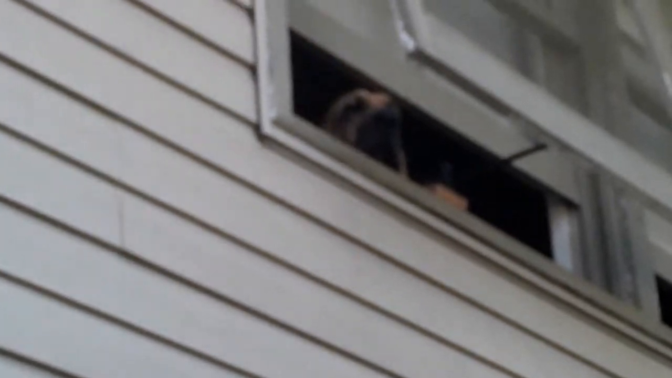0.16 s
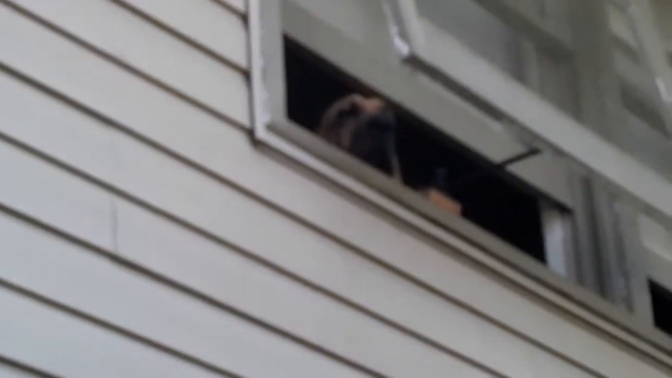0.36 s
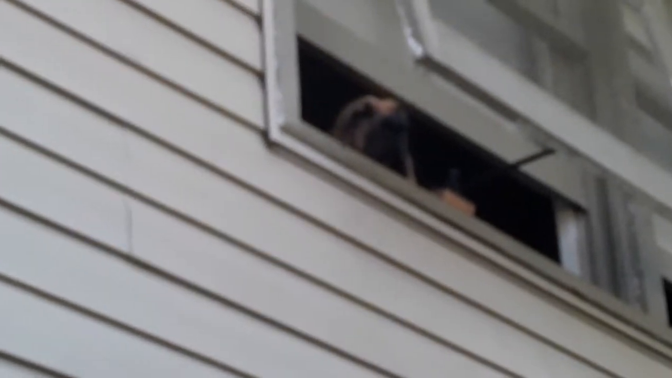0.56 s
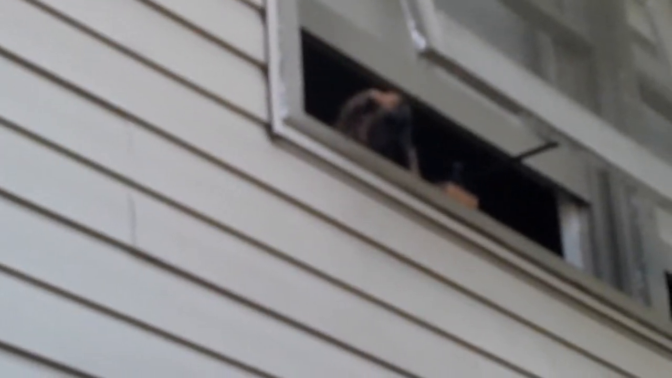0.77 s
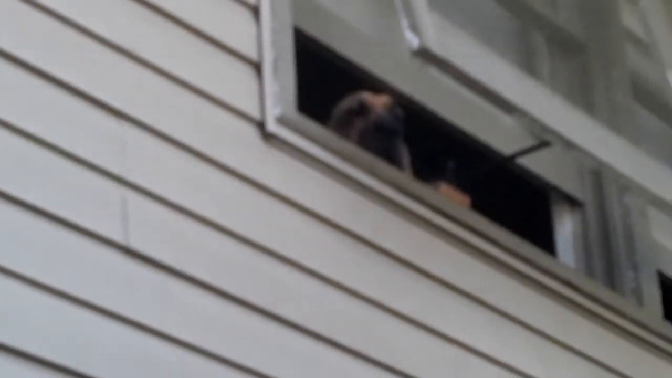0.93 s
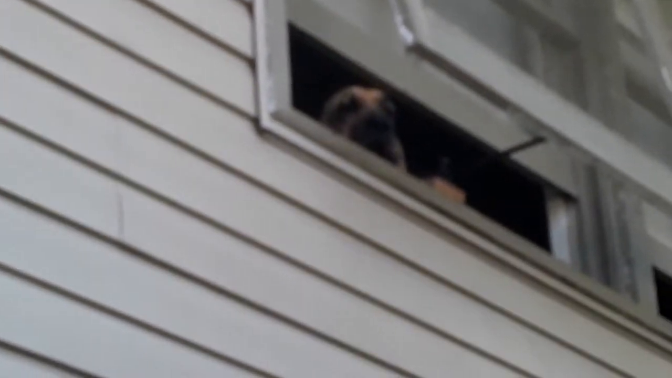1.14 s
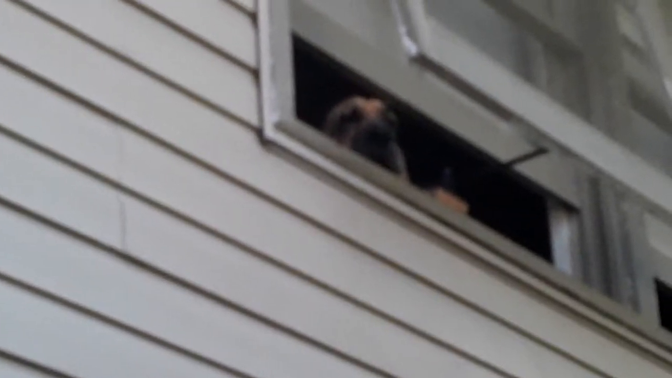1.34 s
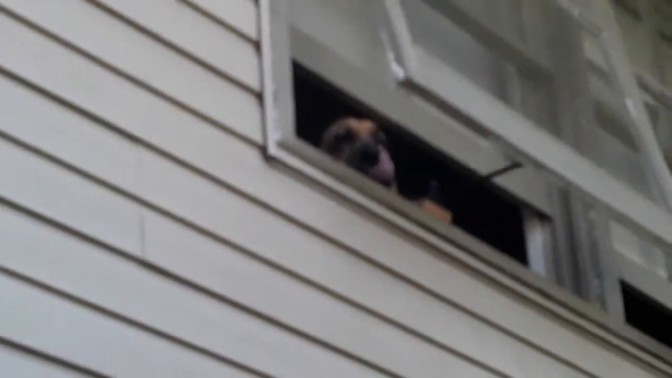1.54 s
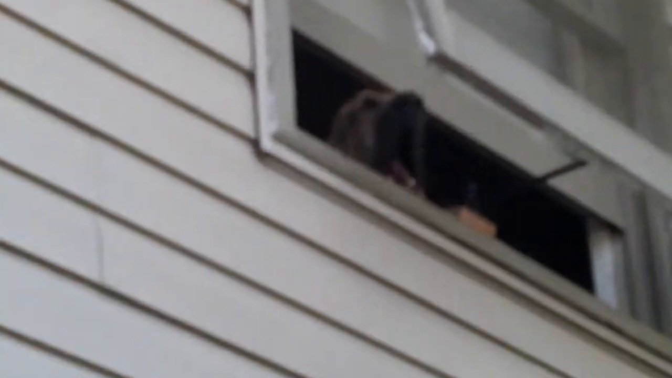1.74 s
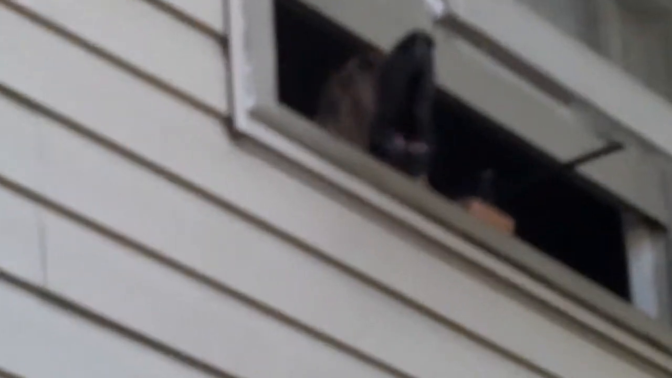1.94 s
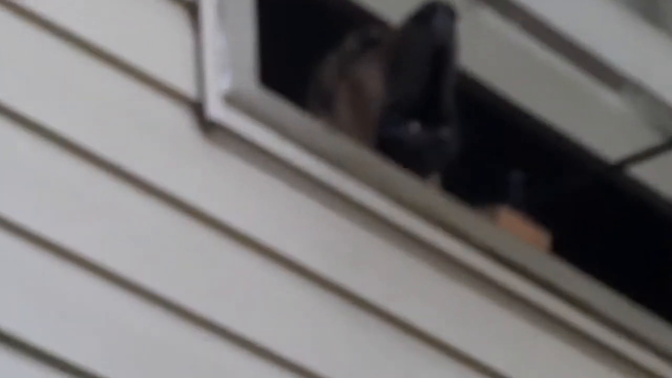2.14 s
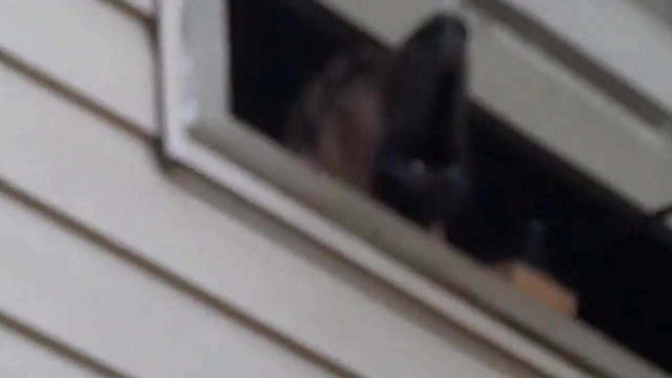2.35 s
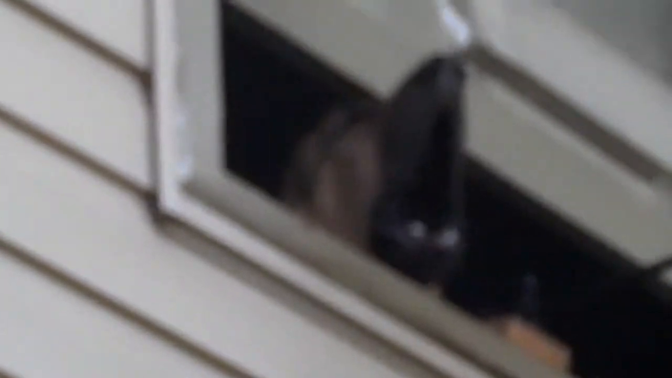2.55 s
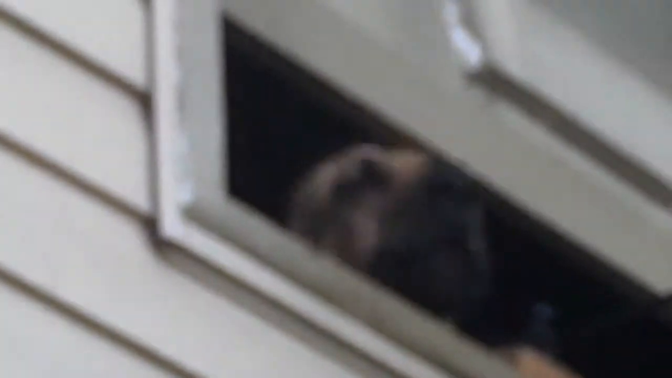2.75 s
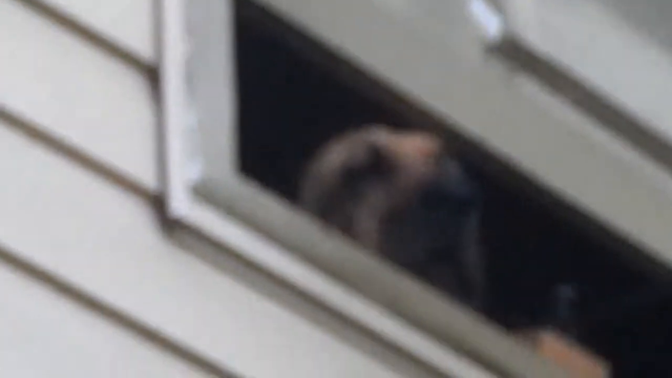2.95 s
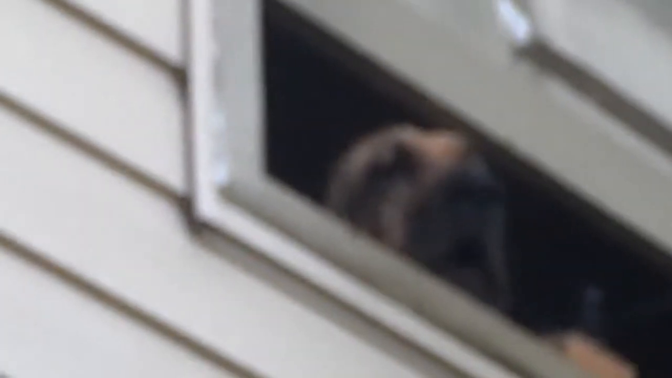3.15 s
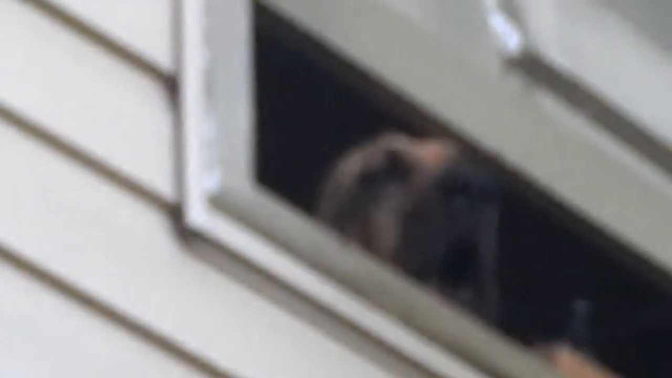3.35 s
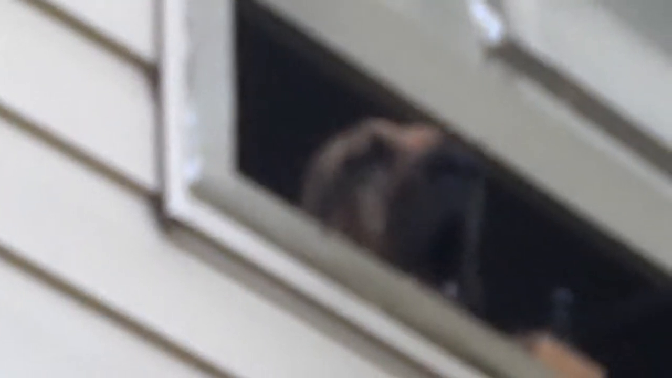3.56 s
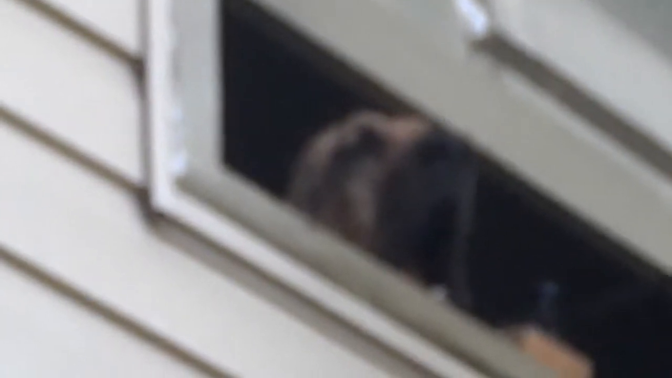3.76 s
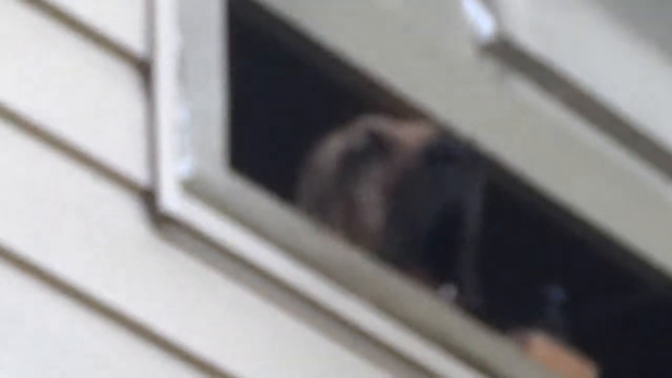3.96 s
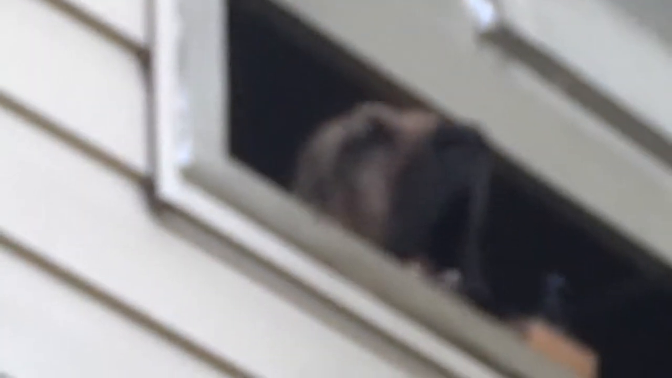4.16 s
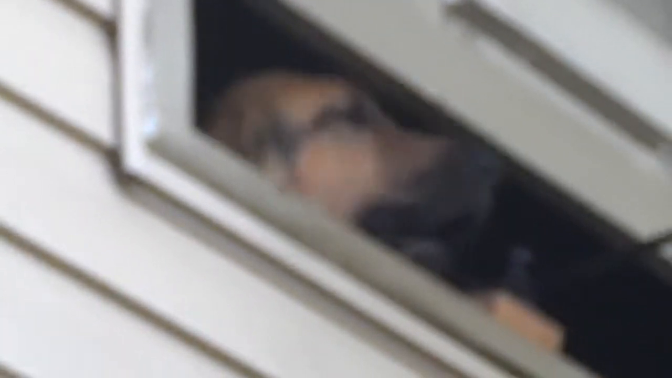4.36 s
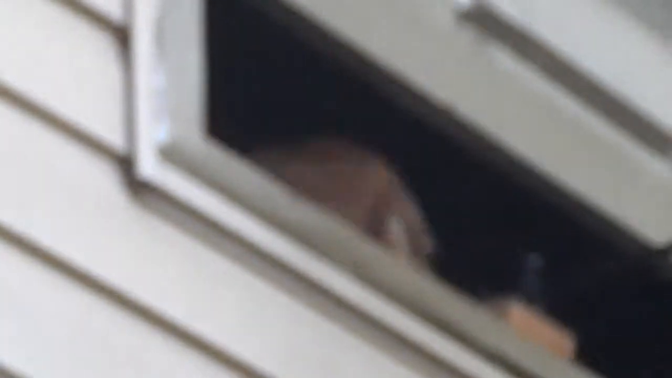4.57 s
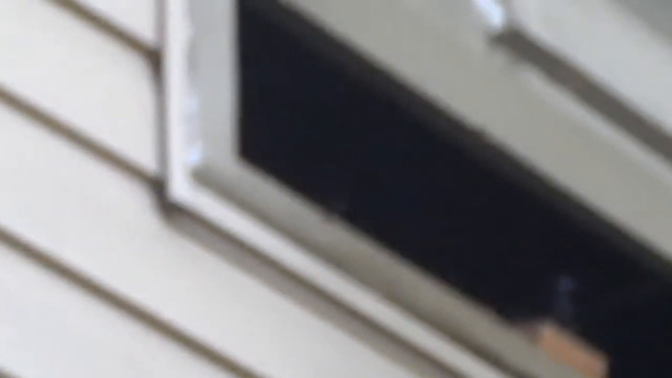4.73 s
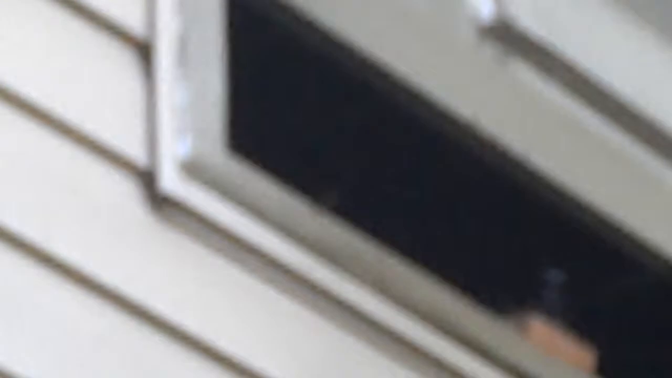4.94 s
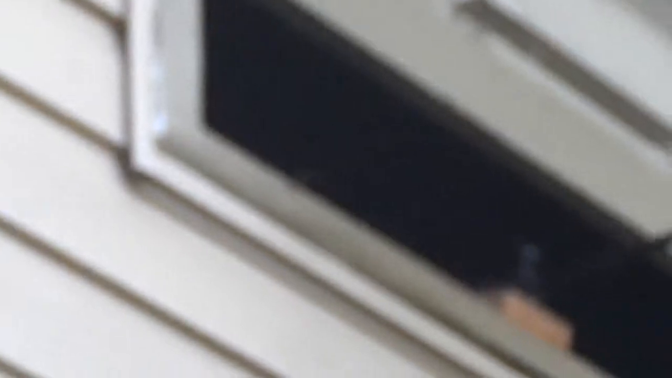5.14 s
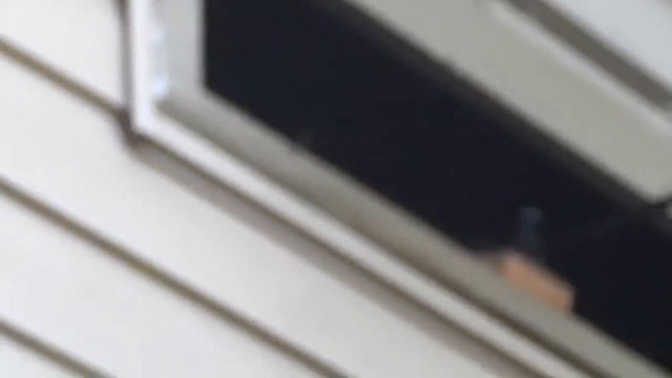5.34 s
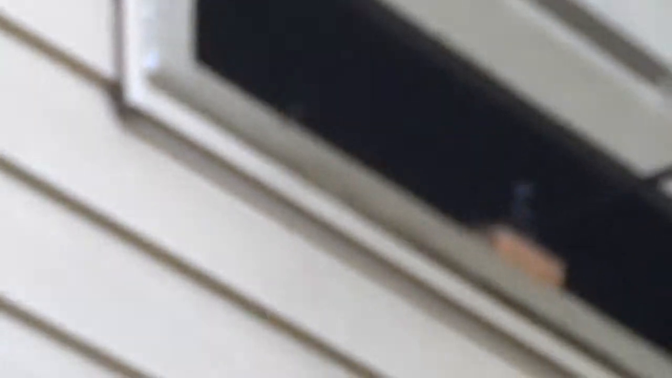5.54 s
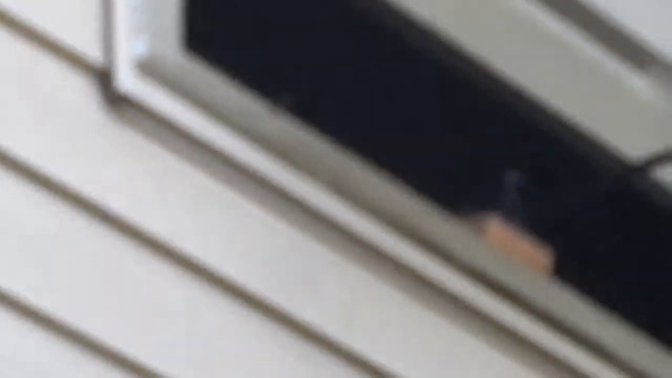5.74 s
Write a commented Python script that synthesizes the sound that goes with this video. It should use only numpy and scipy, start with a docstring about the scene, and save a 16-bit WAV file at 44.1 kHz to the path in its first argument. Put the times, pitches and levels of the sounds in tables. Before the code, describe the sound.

A large hound throws out a long loud howl, then a breaking, yodelling one, while a hoarser dog bays farther off and sparrows chirp.

```python
"""A bloodhound howls, then yodels, from an open upstairs window: its voice swoops, splits and breaks into rasp.
Its vocal folds are summed harmonics, shaped by throat, mouth and lips. A second, hoarse dog bays further off.
A thin whine and chirping sparrows are gliding tones; lip smacks and outdoor air are shaped noise.
Two wavering low tones hum, and the walls of the yard echo everything but the air and hum."""
import sys
import numpy as np
from scipy import signal
from scipy.fft import rfft, irfft, next_fast_len
from scipy.io import wavfile
from scipy.ndimage import uniform_filter1d, map_coordinates

SR = 44100
rng = np.random.default_rng(int(sys.argv[2]) if len(sys.argv) > 2 else 0)


def generate_wav(sig):
    """Save sig (samples, or channels by samples) to the path in sys.argv[1] as 16-bit PCM at SR."""
    pcm = np.round(np.clip(np.atleast_2d(sig).T, -1, 1) * 32767).astype(np.int16)
    wavfile.write(sys.argv[1], SR, pcm)


N = 255779  # length in samples
TOP_HZ = 15650  # no sound above this


def amp(db):
    """Decibels to gain."""
    return 10 ** (np.asarray(db) / 20)


def unit(x):
    """Scale to rms 1."""
    return x / np.sqrt(np.mean(x ** 2) + 1e-20)


def along(points, hz):
    """Read a curve of (Hz, value) points on a log frequency axis."""
    f, v = np.transpose(points)
    return np.interp(np.log(hz + 1), np.log(f + 1), v)


def curves(rows):
    """One value per sample for each column after the time."""
    s, *cols = np.transpose(rows)
    return [np.interp(np.arange(N) / SR, s, c) for c in cols]


def wobble(rate):
    """A smooth random curve, with this many random points a second."""
    return map_coordinates(rng.standard_normal(N // 16), [np.arange(N) * rate / SR], mode="wrap")


def filtered(x, response):
    """Multiply the spectrum of x by a function of frequency."""
    size = next_fast_len(N + 8192)
    spectrum = rfft(x, size) * response(np.fft.rfftfreq(size, 1 / SR))
    return irfft(spectrum, size)[..., :N]


def coloured(x, points):
    """Shape x with a curve of (Hz, dB) points."""
    return filtered(x, lambda hz: amp(along(points, hz)))


def steady(x):
    """Hold the short-term rms at 1."""
    return x / np.sqrt(np.abs(uniform_filter1d(x ** 2, size=900)) + 1e-12)


def sounding(phrases):
    """1 while a phrase lasts, with soft edges; phrases that touch are joined."""
    t = np.arange(N) / SR
    on = sum((t > p[0][0] - .006) & (t < p[-1][0] + .006) for p in phrases) > 0
    return uniform_filter1d(on * 1., size=300)


def step(at, edge):
    """A smooth rise from 0 to 1 around a moment."""
    return .5 + .5 * np.tanh((np.arange(N) / SR - at) / edge)


def held(start, end, attack, release):
    """Rise smoothly to 1, hold, and fall smoothly to 0."""
    return step(start, attack) * (1 - step(end, release))


def spread(pair, width):
    """Two unrelated signals become a shared part and a part opposed in the two channels."""
    shared, opposed = pair[0], width * pair[1]
    return np.array([shared + opposed, shared - opposed]) / np.hypot(1, width)


# How fast the yard's echo dies. Each row: frequency in Hz, time to fall by 60 dB in seconds.
YARD_DECAY = [(200, 0.12), (600, 0.47), (1500, 0.42), (4000, 0.41), (10000, 0.29)]


def echo(x, width=0.63):
    """The yard's answer: a tail of noise in which each frequency dies at its own speed."""
    hz, t, z = signal.stft(rng.standard_normal((2, SR)), SR, nperseg=256)
    decay = amp(-60 * t / along(YARD_DECAY, hz)[:, None])
    tail = signal.istft(z * decay, SR, nperseg=256)[1]
    tail = spread(tail / np.linalg.norm(tail[0]), width)
    tail = np.pad(tail, ((0, 0), (500, 0)))  # the walls answer after 500 samples
    return signal.fftconvolve(x[None], tail, axes=1)[:, :N]


def folds(pitch, split, rasp, lock, swing, jitter, hiss, tremor):
    """Vocal folds; when split, a second oscillation, locked to a fraction of the pitch, pushes the pulses about."""
    phase = 2 * np.pi * np.cumsum(pitch * (1 + tremor * wobble(70))) / SR
    second = split * np.sin(phase * lock + rasp * wobble(90))
    phase = phase + swing * second + jitter * rasp * wobble(420)
    pulses = sum(np.sin(k * phase) / k * (k * pitch < TOP_HZ) for k in range(1, 25))
    size = 1 + .5 * second + .35 * rasp * wobble(260)
    # air rushes through once a cycle
    air = unit(coloured(rng.standard_normal(N), [(500, -1.0), (2000, -10), (10000, -15.5)]))
    return pulses * size + hiss * (rasp + 0.06) * air * (1 + np.cos(phase))


# Tone colour of the outdoor air. Each row: frequency in Hz, relative level in dB.
AIR_COLOUR = [(25, -19), (70, -16), (115, -0.5), (200, -6), (330, -4.5), (550, -7.5), (1000, -13.5),
              (2000, -17.5), (3800, -19.5), (6000, -25), (9000, -29.5), (15000, -37.5)]
# The recorder turns the background down around the loud howls, then back up.
# Each row: time in seconds, level of the air in dB.
AIR_LEVEL = [(0, -59.5), (1.8, -55), (2.1, -63), (3.2, -63), (4, -58.5), (4.8, -61), (5.2, -59)]
# Tones of the hum. Each row: frequency in Hz, relative level in dB.
HUM_TONES = [(118.4, -69), (172.3, -72)]


def background():
    """Outdoor air as shaped noise, and the unsteady hum of a distant machine as wavering sines."""
    air_db, = curves(AIR_LEVEL)
    air = unit(coloured(spread(rng.standard_normal((2, N)), width=0.05), AIR_COLOUR))
    air = air * amp(0.35 * wobble(1.9))
    t = np.arange(N) / SR
    hum = np.zeros(N)
    for hz, db in HUM_TONES:
        level = amp(db + 4.0 + 1.1 * wobble(0.57))
        hum += level * np.sin(2 * np.pi * hz * t + 2.0 * wobble(3.7))
    # the recorder's changing gain lowers and raises the hum together with the air
    return amp(air_db) * air + amp(air_db - air_db.mean()) * hum


BAY_TAPER_DB = 5.5  # a call is this much weaker at its ends
BAY_SKEW = 0.13  # the pitch sags less at the start than at the end
THROAT_DB_PER_OCTAVE, MOUTH_DB_PER_OCTAVE = 20, 71  # fading as the arch of pitch sinks
SLACK_SPLIT_PER_OCTAVE, SLACK_RASP_PER_OCTAVE = 2.2, 1.3  # roughening as it sinks


def bay(start, length, hz, glide, arch, throat_db, mouth_db, split, rasp):
    """One call as rows of (s, pitch, throat dB, mouth dB, split, rasp): loudest and clearest atop its arch."""
    u = np.linspace(-1, 1, 15)  # from the start of the call to its end
    sag = arch * u ** 2 * (1 + BAY_SKEW * u)  # octaves below the top of the arch
    taper_db = BAY_TAPER_DB * u ** 2
    return np.transpose([start + length * (u + 1) / 2,
                         hz * 2 ** (glide * u / 2 - sag),
                         throat_db - taper_db - THROAT_DB_PER_OCTAVE * sag,
                         mouth_db - taper_db - MOUTH_DB_PER_OCTAVE * sag,
                         split + SLACK_SPLIT_PER_OCTAVE * sag,
                         rasp + SLACK_RASP_PER_OCTAVE * sag])


# The far dog's bays and whimpers, each an arch of pitch on a glide. Each row: start in seconds, length
# in seconds, pitch in Hz, glide in octaves, arch in octaves, relative throat level in dB,
# relative mouth level in dB, split of the folds (0-1), rasp (0-1).
BAYS = [(0, .135, 490, -.3, .01, -46, -62, 1, 0.8), (0.656, .28, 379.6, .01, .34, -34.5, -31, 0.1, 0.43),
        (1.305, .295, 362.7, -.06, .28, -32, -29.5, 0.08, 0.2),
        (2.931, 0.25, 456.3, .03, .01, -62.5, -56.5, 0.3, .35),
        (4.924, .12, 388, -.35, .01, -40, -52.5, 0.08, 0.1),
        (5.038, .24, 396.9, 0.16, 0.033, -38.5, -56.5, .1, 0),
        (5.297, .3, 375.1, -.1, .28, -34, -36.5, .5, 0.4),
        (5.758, 0.032, 339.6, -0.29, 0.0034, -39, -65, 0, 0)]
# Resonances of its throat and mouth. Each row: frequency in Hz, relative level in dB.
FAR_THROAT = [(150, -46.5), (280, -1.5), (380, -6.5), (550, -3.5), (720, -26.5), (900, -27), (1200, -85.5)]
FAR_MOUTH = [(550, -50), (760, -6), (900, -2), (1080, 3.5), (1280, -12), (1440, -3), (1530, -3),
             (1700, -19.5), (1900, -12.5), (2300, -11), (3200, -55)]
# Rings when a bay opens into a bark. Each row: frequency in Hz, relative level in dB.
FAR_GAPE = [(330, -33), (470, 13.5), (570, 0), (720, -6.5), (900, -35.5)]
# Sizzle of teeth and lips, for both dogs. Each row: frequency in Hz, relative level in dB.
SIZZLE_COLOUR = [(2100, -60), (2650, -30.5), (3300, 3.5), (4600, 4.5), (6000, 4), (7400, 2.5), (8700, -6),
                 (11000, -9.5), (15000, -16)]
BAY_LOCK = 2 / 3  # when the folds split, the second oscillation runs at this fraction of the pitch
BAY_WAVER_DB, BAY_WAVER_RATE = 2, 28  # random waver in strength; its random points a second


def far_dog():
    """Hoarse bays: rough folds ring in a throat and a mouth, and arrive with much more echo."""
    calls = [bay(*row) for row in BAYS]
    pitch, throat_db, mouth_db, *roughness = curves(np.vstack(calls))
    split, rasp = np.clip(roughness, 0, 1)
    source = folds(pitch, split, rasp, lock=BAY_LOCK, swing=0.4, jitter=0.46, hiss=0.75, tremor=.014)
    throat = coloured(source, FAR_THROAT) + 5.6 * split * coloured(source, FAR_GAPE)
    voice = amp(throat_db - 5.5) * steady(throat)
    voice += amp(mouth_db - 5.5) * steady(coloured(source, FAR_MOUTH))
    breathy = source + 0.18 * rng.standard_normal(N)
    voice += amp(mouth_db - 29) * steady(coloured(breathy, SIZZLE_COLOUR))
    # a hoarse throat sputters
    sputter_db = 2 * rasp * wobble(50) + BAY_WAVER_DB * wobble(BAY_WAVER_RATE)
    voice *= sounding(calls) * amp(sputter_db)
    return voice + amp(-6.0) * echo(voice, width=0.69)


# One sparrow chirp, before each bird's own pitch and level.
# Each row: time from its start in seconds, pitch in Hz, relative level in dB.
CHIRP = [(0, 3472, -8), (.011, 4900, -1.5), (.024, 4552, -10), (.031, 3903, 5), (.043, 3271, 5),
         (.066, 2764, -40), (.08, 2900, 0), (.091, 3314, 2.5), (0.113, 2987, -25.5)]
# The chirps. Each row: start in seconds, relative level in dB, pitch ratio, echo relative to the chirp in dB.
SPARROWS = [(0.593, -66, 1.3, 6), (0.85, -57, 1.11, 1.5), (1.361, -52, 1.15, 8.5), (1.726, -40, 1.02, -6),
            (2.846, -54.5, 0.99, -5), (3.129, -72.5, 1.28, 7), (3.519, -63, 1.13, 4.5),
            (3.761, -56.5, 1.09, -0.5), (3.916, -61.5, 1.12, -1), (4.549, -72, 1.3, 9),
            (4.639, -72, 1.08, -4), (4.873, -54.5, 1.3, 0), (4.889, -54.5, 1.05, -0.5), (5.532, -46, 1, -8)]


def sparrows():
    """Each chirp sweeps up, drops and flicks again, sung by both sides of the syrinx; far birds are mostly echo."""
    direct, scattered = np.zeros((2, N))
    flutter = 1 + 0.09 * wobble(500)
    for start, db, ratio, echo_db in SPARROWS:
        shape = np.array(CHIRP) + [start, 0, 0]
        pitch, contour_db = curves(shape)
        phase = 2 * np.pi * np.cumsum(pitch * ratio * flutter) / SR
        both_sides = np.sin(phase) + amp(-7.5) * np.sin(0.96 * phase)
        chirp = amp(db + contour_db) * sounding([shape]) * both_sides
        direct += chirp
        scattered += amp(echo_db) * chirp
    return direct + echo(scattered)


# Notes of a thin nasal whine. Each row: start in seconds, end in seconds, pitch in Hz, level in dB.
WHINES = [(1.03, 1.117, 2853, -43.5), (1.165, 1.234, 2900, -51), (1.235, 1.364, 2852, -36),
          (1.395, 1.52, 2670, -49.5), (1.605, 1.688, 2860, -44.5)]
WHINE_DROP_HZ, WHINE_DROP_S, WHINE_EDGE_S = 160, .012, 0.0089  # each note droops as it ends


def whine():
    """A high, fluttering whistle through the nose, with weak overtones."""
    tone, waver = np.zeros(N), 1 + 0.015 * wobble(70)
    for start, end, hz, db in WHINES:
        droop = WHINE_DROP_HZ * step(end - WHINE_DROP_S, WHINE_DROP_S)
        phase = 2 * np.pi * np.cumsum((hz - droop) * waver) / SR
        note = np.sin(phase) + amp(-16) * np.sin(2 * phase) + amp(-20) * np.sin(3 * phase)
        tone += amp(db) * held(start, end, WHINE_EDGE_S, WHINE_EDGE_S) * note
    tone *= amp(2.6 * wobble(60))
    return tone + amp(-16.5) * echo(tone)


# Smacks of the lips. Each row: start in seconds, relative level in dB, time to fall by 60 dB in seconds.
SMACKS = [(1.703, -32, 0.12), (5.309, -46, 0.099)]
# Their tone colour. Each row: frequency in Hz, relative level in dB.
SMACK_COLOUR = [(300, -31.5), (1500, -3), (2600, -3.5), (4500, 0), (7000, -8.5), (10000, -11.5),
                (15000, -28)]


def smacks():
    """Short wet puffs as the jaws part: noise that swells and dies away."""
    t = np.arange(N) / SR
    swell = np.zeros(N)
    for start, db, t60 in SMACKS:
        rise = np.clip((t - start) / 0.037, 0, 1)
        swell += amp(db - 60 * np.abs(t - start) / t60) * rise
    noise = coloured(rng.standard_normal(N), SMACK_COLOUR)
    puffs = swell * unit(noise * amp(1.7 * wobble(280)))
    return puffs + amp(-18.0) * echo(puffs)


# Reflections off sash and sill. Each row: delay in seconds, gain.
WINDOW = [(.0023, 0.088), (.0061, 0.32)]


def window(x):
    """Short reflections make each overtone swell and fade as the pitch glides past."""
    def response(hz):
        return 1 + sum(gain * np.exp(-2j * np.pi * hz * delay) for delay, gain in WINDOW)
    return filtered(x, response)


# Cries of the yodel; each scoops up, holds, then breaks down to a lower note.
# Each row: scoop start in seconds, top reached in seconds, break in seconds, top pitch in Hz,
# low pitch in Hz, level in dB relative to the howl, split of the folds at a full break (0-1).
CRIES = [(3.215, 3.3, 3.342, 479, 314, 0, .4), (3.43, 3.552, 3.6, 483, 398, -3.5, .7),
         (3.705, 3.81, 3.84, 523, 311, -4, .05), (3.98, 4.225, 4.278, 477, 468, -2, 0),
         (4.278, 4.335, 4.464, 499, 295, 2.5, .05)]
REST_HZ, BREAK_S = 312, .012  # pitch of the slack folds; softness in time of a break
PUSH_S, PUSH_DB = .035, 5  # time scale and extra level of the push before a break
PUSH_SAG = .2  # share of the fall that the push already gives way
FULL_BREAK_HZ = 125  # smaller falls are milder
BREAK_RASP_S = 0.016  # time scale of the roughness at a break


def yodel():
    """The chain of cries: pitch, level, the push before each break, the break itself and its split."""
    t = np.arange(N) / SR
    pitch, low = np.full(N, float(REST_HZ)), REST_HZ
    level_db, = curves([(top, db) for _, top, _, _, _, db, _ in CRIES])
    pushing, breaking, split = np.zeros((3, N))
    for start, top, snap, top_hz, low_hz, _, break_split in CRIES:
        scoop = np.sin(np.pi / 2 * np.clip((t - start) / (top - start), 0, 1))
        # before a break the dog pushes harder, and the pitch gives way by a share of its fall
        push = np.exp(np.minimum(t - snap, 0) / PUSH_S)
        broken = step(snap, BREAK_S)
        fall = top_hz - low_hz
        pitch += (top_hz - low) * scoop - fall * (PUSH_SAG * push + (1 - PUSH_SAG) * broken)
        force = np.clip(fall / FULL_BREAK_HZ, 0, 1)
        pushing += force * np.exp(-((t - snap) / PUSH_S + 1) ** 2)
        bump = force * np.exp(-((t - snap - BREAK_S) / BREAK_RASP_S) ** 2)
        breaking += bump
        split += break_split * bump
        low = low_hz
    return pitch, level_db + PUSH_DB * pushing, pushing, breaking, split


# The long howl swoops twice, sags, lifts and falls away. Each row: time in seconds, pitch in Hz.
HOWL_PITCH = [(1.81, 705), (1.832, 564), (1.91, 528), (1.98, 565.7), (2.022, 679.7), (2.05, 557.6),
              (2.15, 544.2), (2.26, 513.2), (2.35, 516.6), (2.41, 500.4), (2.47, 511.4), (2.55, 548.7),
              (2.66, 551), (2.715, 522.3), (2.78, 385.9), (2.84, 290.7)]
# Two breaths, a long howl and a yodel. Each row: start in seconds, end in seconds.
BREATHS = [(1.804, 2.85), (3.266, 4.512)]
# Rough bursts of the long howl, jaws wide. Each row: start in seconds, end in seconds, added split (0-1),
# added rasp (0-1), mouth boost in dB, lips boost in dB.
BURSTS = [(1.8, 1.888, .6, .65, 26, 22), (2.052, 2.145, .95, .38, 20, 20), (2.572, 2.67, .9, .22, 18, 21),
          (2.67, 2.755, .5, .75, 15, 12)]
# Each resonance has its best pitches.
# Each row: pitch in Hz, throat level in dB, mouth level in dB, lips level in dB, all relative.
REGISTER = [(278, -35, -41.5, -54), (328, -40, -57, -44.5), (421, -36.5, -36, -48),
            (439.1, -27, -31.5, -44), (478.8, -19, -35.5, -36.5), (481.9, -20, -48.5, -39.5),
            (527, -18.5, -41, -37), (561.5, -15.5, -36.5, -43.5), (667, -34.5, -41.5, -38)]
BREATH_ATTACK_S, BREATH_RELEASE_S = 0.012, 0.061
BURST_EDGE_S, JAW_OPEN_S, JAW_CLOSE_S = 0.012, 0.038, 0.028
BREAK_RASP, BREAK_MOUTH_DB = .6, 10.5  # every break rasps briefly and opens the mouth
PUSH_LIPS_DB = 6  # the lips ring brighter during the push
CLEAN_SPLIT, CLEAN_RASP = .01, .09  # even the clear voice is slightly rough
SPENT_RASP = 0.82  # the voice grows rough as the breath runs out
SURGE_DB, SURGE_S = 4, .026  # the throat surges as a burst ends
NULL_HZ, NULL_WIDTH_HZ, NULL_DB = 512, 8, 17  # a reflection weakens the throat near this pitch


def howling():
    """The hound's controls: pitch sets each resonance; bursts and breaks roughen it and open the jaws."""
    t = np.arange(N) / SR
    yodelling = t > (BREATHS[0][1] + BREATHS[1][0]) / 2
    cry_pitch, cry_db, pushing, breaking, split = yodel()
    pitch = np.where(yodelling, cry_pitch, curves(HOWL_PITCH)[0])
    register = np.array(REGISTER)
    throat_db, mouth_db, lips_db = [along(register[:, [0, k]], pitch) + cry_db * yodelling
                                    for k in range(1, 4)]
    mouth_db += BREAK_MOUTH_DB * breaking
    lips_db += PUSH_LIPS_DB * pushing
    air = sum(held(start, end, BREATH_ATTACK_S, BREATH_RELEASE_S) for start, end in BREATHS)
    rasp = CLEAN_RASP + BREAK_RASP * breaking + SPENT_RASP * (1 - air)
    for start, end, burst_split, burst_rasp, mouth_boost_db, lips_boost_db in BURSTS:
        rough = held(start, end, BURST_EDGE_S, BURST_EDGE_S)
        jaws = held(start, end, JAW_OPEN_S, JAW_CLOSE_S)
        split += burst_split * rough
        rasp += burst_rasp * rough
        # the fundamental surges as the folds lock again
        throat_db += SURGE_DB * np.exp(-((t - end) / SURGE_S) ** 2)
        mouth_db += mouth_boost_db * jaws
        lips_db += lips_boost_db * jaws
    split, rasp = np.clip([split + CLEAN_SPLIT, rasp], 0, 1)
    # a reflection cancels the fundamental as it passes one pitch, less so in a rough voice
    throat_db -= NULL_DB * (1 - rasp) * np.exp(-((pitch - NULL_HZ) / NULL_WIDTH_HZ) ** 2)
    levels_db = uniform_filter1d([throat_db, mouth_db, lips_db], size=400, axis=1)
    return pitch, split, rasp, air, levels_db


# Resonances of the hound's throat, mouth and lips. Each row: frequency in Hz, relative level in dB.
THROAT = [(150, -47), (290, -18), (400, 7), (520, 13.5), (630, 0), (740, 6), (900, -39.5), (1200, -91)]
MOUTH = [(550, -55.5), (720, -19), (820, -1.5), (950, -6.5), (1120, 1), (1240, -8.5), (1400, -34),
         (1800, -74)]
LIPS = [(950, -60.5), (1200, -22.5), (1350, 3.5), (1470, 2.5), (1620, -4.5), (1800, -1.5), (2000, -9.5),
        (2200, -11.5), (2500, -28), (3200, -80)]
# The head turns away. Each row: time in seconds, left minus right in dB, change of sizzle in dB.
HOWL_PAN = [(2.9, 0, 4.5), (3.25, 0.3, -3.5)]
HOWL_LOCK = 3 / 4  # when the folds split, the second oscillation runs at this fraction of the pitch
SIZZLE_BREATH = .09  # share of breath noise in the sizzle


def hound():
    """The near howl: folds ring in three resonances that open in turn, with a breathy sizzle on top."""
    pitch, split, rasp, air, (throat_db, mouth_db, lips_db) = howling()
    pan_db, sizzle_db = curves(HOWL_PAN)
    source = folds(pitch, split, rasp, lock=HOWL_LOCK, swing=0.83, jitter=0.22, hiss=0.29, tremor=.004)
    # the low resonance bends round the window frame; the overtones bounce off it
    overtones = window(source)
    voice = amp(throat_db) * steady(coloured(source, THROAT))
    for db, shape in [(mouth_db, MOUTH), (lips_db, LIPS)]:
        level = amp(db - 2.85 + 4.1 * wobble(45))
        voice += level * steady(coloured(overtones, shape))
    breath = coloured(rng.standard_normal(N), [(3000, -3.5), (12000, -12.0)])
    sizzle = steady(coloured(overtones + SIZZLE_BREATH * breath, SIZZLE_COLOUR))
    sizzle *= amp(lips_db + sizzle_db - 24.0 + 0.77 * split)
    voice, sizzle = np.array([voice, sizzle]) * air
    direct = (voice + sizzle) * amp(np.array([pan_db, -pan_db]) / 2)
    return direct + echo(amp(-13.5) * voice + amp(-10) * sizzle, width=0.47)


def scene():
    """Both dogs, the whine, the birds, the smacks and the yard."""
    return background() + far_dog() + sparrows() + whine() + smacks() + hound()


# Level balance of the two microphone ports. Each row: frequency in Hz, left minus right in dB.
PORT_BALANCE = [(60, -7.5), (110, 3), (200, 8.5), (380, 2), (700, 0.5), (1290, -3), (2380, -5), (4400, -1),
                (8120, -2.5), (15000, 4.5)]
# Phase between the ports. Each row: frequency in Hz, lead of the left port in radians.
PORT_PHASE = [(0, -2.6), (130, -1.9), (270, -.7), (520, -.55), (1000, -.1), (1650, 0), (1900, .7),
              (2100, 2.6), (2770, 3.14), (15200, 31.4)]


def record(dry):
    """The two microphone ports differ in level and phase; nothing passes above the band limit."""
    side = np.array([[.5], [-.5]])  # half of each difference goes to each port

    def ports(hz):
        balance = amp(side * along(PORT_BALANCE, hz))
        lead = side * np.interp(hz, *np.transpose(PORT_PHASE))
        return balance * np.exp(1j * lead) * (hz < TOP_HZ)
    return filtered(dry, ports)


dry = scene()
out = record(dry)
generate_wav(out)
```